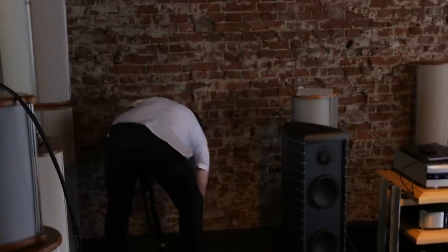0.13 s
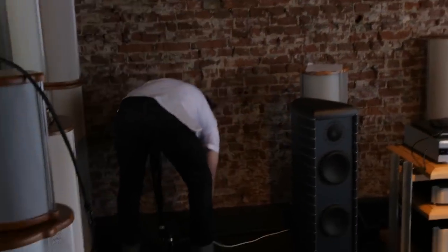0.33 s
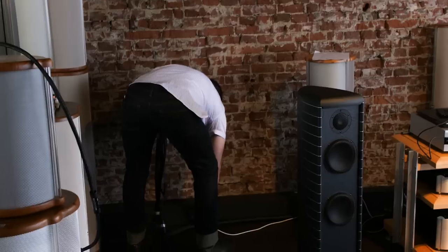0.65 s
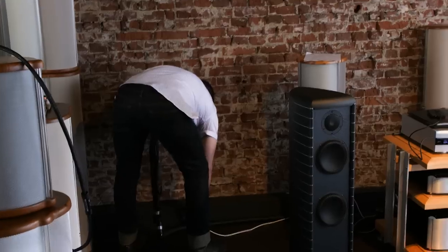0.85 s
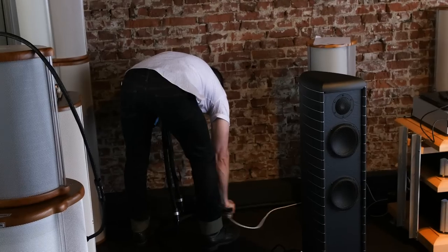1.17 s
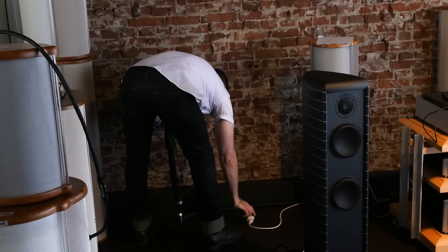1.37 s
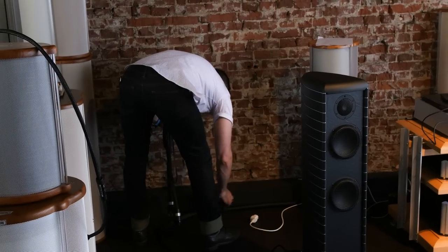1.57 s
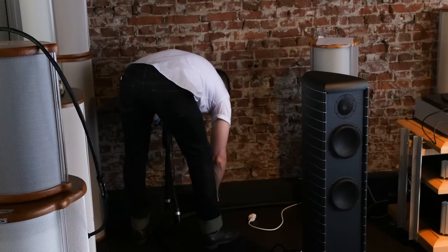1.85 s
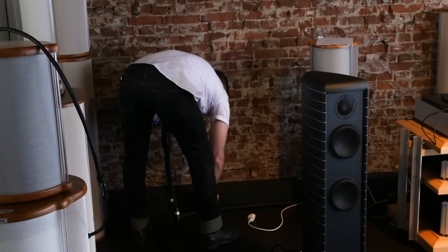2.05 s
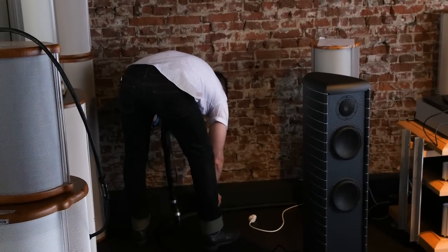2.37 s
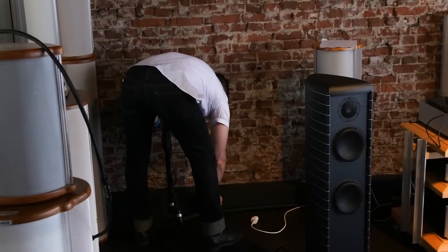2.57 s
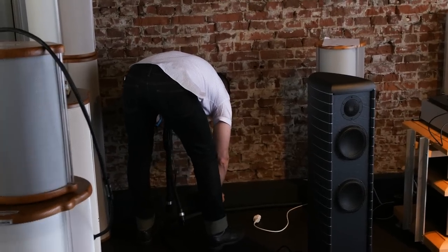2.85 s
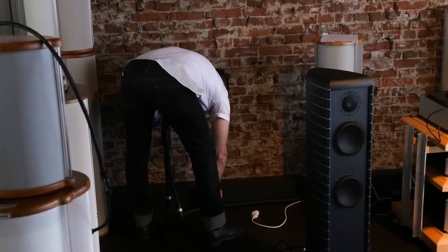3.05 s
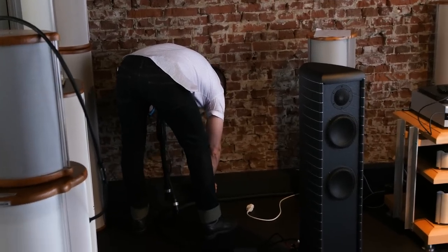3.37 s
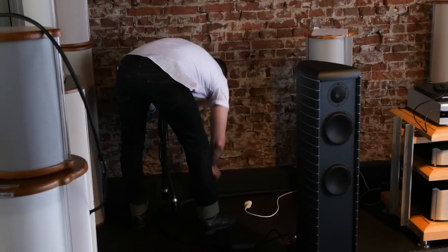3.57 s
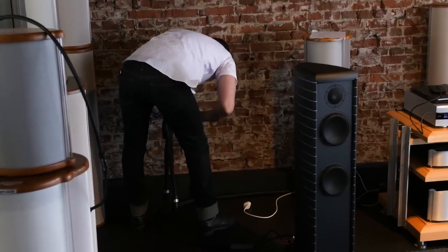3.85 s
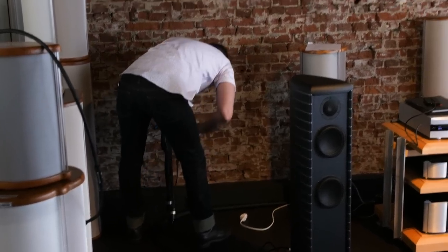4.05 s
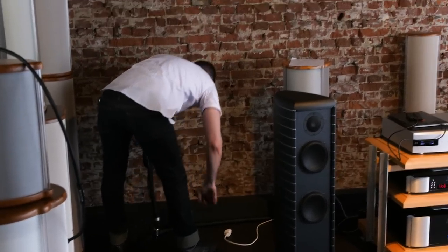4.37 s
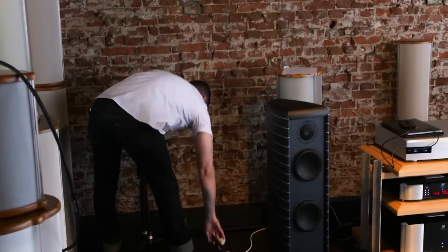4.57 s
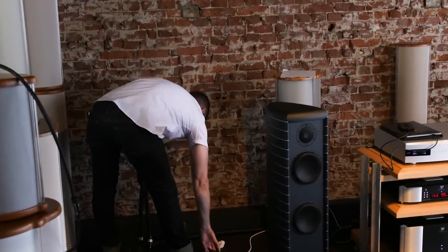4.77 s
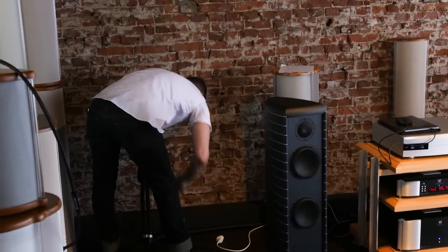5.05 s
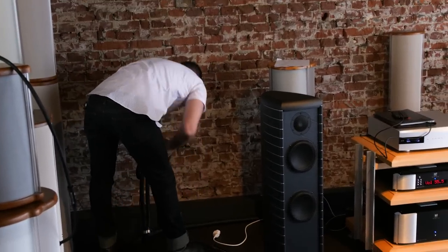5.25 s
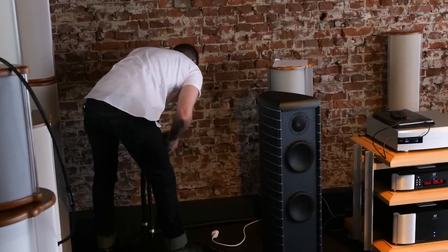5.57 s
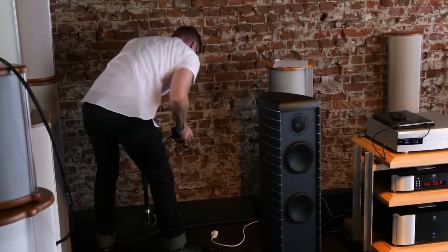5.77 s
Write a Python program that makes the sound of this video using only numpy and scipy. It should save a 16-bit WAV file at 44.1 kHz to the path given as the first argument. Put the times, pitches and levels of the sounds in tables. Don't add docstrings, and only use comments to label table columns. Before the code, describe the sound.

In a quiet brick room with faint ventilation, someone bent near the floor handles a plug and cable. Soft bumps and cloth brushing come first, then irregular hard plastic cracks with short hollow thuds from boards and a socket box. Later the cable only ticks lightly in the hands, ending with a quick bright crackle. A close stereo microphone catches dry detail and short room echo.

```python
import sys
import numpy as np
from scipy import signal
from scipy.fft import rfft, irfft
from scipy.io import wavfile
from scipy.ndimage import uniform_filter1d

SR = 44100
rng = np.random.default_rng(int(sys.argv[2]) if len(sys.argv) > 2 else 0)


def waveform_to_disk(signal):
    frames = np.transpose(np.atleast_2d(signal))
    scaled = np.clip(frames, -1, 1) * 32767
    samples = np.round(scaled).astype(np.int16)
    wavfile.write(sys.argv[1], SR, samples)


def gain_from_decibels(decibels):
    exponent = np.asarray(decibels, float) / 20
    return 10 ** exponent


N = 261072

LEFT_RIGHT = np.array([[1], [-1]])


def rms_one(x):
    return x / np.sqrt(np.mean(x ** 2) + 1e-20)


def at_hz(points, hz):
    points = np.array(points)
    return np.interp(np.log(np.maximum(hz, 1)), np.log(points[:, 0]), points[:, 1])


def colour(x, spectrum):
    hz = np.fft.rfftfreq(N, 1 / SR)
    return rms_one(irfft(rfft(x) * gain_from_decibels(at_hz(spectrum, hz)), N))


def band(x, low_hz, high_hz):
    return signal.sosfilt(signal.butter(2, [low_hz, high_hz], "band", fs=SR, output="sos"), x)


def drift(rate_hz):
    r = np.exp(-2 * np.pi * rate_hz / SR)
    wander = signal.lfilter([1], [1, -2 * r, r * r], rng.standard_normal(N + SR))
    return rms_one(wander[SR:])


def ring(x, modes):
    out = 0
    for k, (hz, db, t60) in enumerate(modes):
        r = gain_from_decibels(-60 / (max(t60, 0.002) * SR))
        w = 2 * np.pi * hz / SR
        gain = (-1) ** k * gain_from_decibels(db) * np.sin(w)
        out = out + signal.lfilter([0, gain], [1, -2 * r * np.cos(w), r * r], x + 1e-18)
    return out


def add(track, s, piece):
    i = round(s * SR)
    track[..., i:i + piece.shape[-1]] += piece[..., :N - i]


def swells(rows, rest_db):
    t = np.arange(N) / SR
    level = np.full(N, float(rest_db))
    for s, db, rise_s, fall_s in rows:
        before = (s - t) / max(rise_s, 0.01)
        after = (t - s) / max(fall_s, 0.01)
        level = np.maximum(level, db - 10 * np.maximum(before, after))
    return level


def pair(spectrum):
    # pitch_hz, likeness (0 to 1)
    likeness = [(60, 0.67), (240, 0.59), (950, 0.38), (3770, 0.13), (15000, 0.55)]
    # pitch_hz, level_db
    lean = [(60, 2), (300, -3.5), (1000, -7.5), (4000, -3)]
    hz = np.fft.rfftfreq(N, 1 / SR)
    alike = at_hz(likeness, hz)
    mid, side = rfft(rng.standard_normal((2, N)))
    both = np.sqrt(1 + alike) * mid + np.sqrt(1 - alike) * side * LEFT_RIGHT
    return colour(irfft(both * gain_from_decibels(at_hz(lean, hz) / 2 * LEFT_RIGHT), N), spectrum)


def background():
    # pitch_hz, level_db (per Hz)
    air = [(12, -25), (20, -11.5), (65, 4.5), (121, 2), (314, -4.5), (566, -10), (772, -9.5), (939, -13.5),
           (1210, -15), (1430, -20), (2810, -27), (4410, -31.5), (7510, -33.5), (14700, -36.5),
           (16500, -41)]
    # peak_s, level_db, rise_s (by 10 dB), fall_s (by 10 dB)
    sways = [(0.05, -43, .1, 0.1), (0.23, -41, .3, .5), (0.67, -40, 0, -1.8), (0.95, -43, 0.4, 1),
             (1.09, -34, -0.03, 0.25), (1.4, -40, -1.5, 0.1), (1.94, -47, 1, 0), (2.95, -45, -0.5, -0.2),
             (3.12, -41.5, 0.5, 0.26), (3.33, -43, 0.5, 0.3), (3.64, -42, 0, 0.4), (4.73, -46, 0.3, -0.2),
             (4.95, -46, -0.16, 0.6), (5.69, -35, -0.5, -0.5)]
    low = band(band(rng.standard_normal((3, N)), 46.3, 78.3), 21, 200)
    rumble = rms_one(low[0] + 1.07 * low[1:])
    return gain_from_decibels(-55) * pair(air) + rumble * gain_from_decibels(swells(sways, rest_db=-62) - 6)


def rubbing():
    # peak_s, level_db, rise_s (by 10 dB), fall_s (by 10 dB)
    brushes = [(0.0, -54, .1, -0.18), (0.25, -61, 2, 0.2), (1.1, -60.5, .02, 0.3), (1.55, -66, 1.2, 0.5),
               (1.04, -44, 0.03, 0.04), (2.57, -71.5, 3, 6), (3.1, -60.5, 0.25, -2),
               (3.635, -56, 0.1, 0.13), (3.77, -63.5, .5, 0.3), (4.2, -68, .4, 5), (4.35, -60, -0.14, 0.3),
               (4.72, -59, 0.05, 0.05), (5.55, -48.5, -0.01, 0.06), (5.585, -53, 0, .04),
               (5.625, -47, 0, 0.02), (5.775, -66, 0.2, .05), (5.83, -65, 0.7, .08),
               (4.22, -62.5, 0.1, -0.2)]
    # peak_s, level_db, rise_s (by 10 dB), fall_s (by 10 dB)
    drags = [(0.0, -47, .1, 0.05), (0.4, -55, 1.5, 1), (0.77, -44.5, -1, -0.5), (1.2, -49, 0.25, 0.08),
             (1.6, -41, 0.2, 0.1), (1.94, -67, -2, 0.5), (2.7, -44.5, 0.1, 0.42), (3.0, -54, -0.5, -0.4),
             (3.21, -47, 0.48, 0.59), (3.55, -49, 1.5, 0.07), (4.65, -53.5, 0, 0.9), (5.2, -58, 0.5, -4),
             (5.59, -53.5, -0.1, -0.7), (5.8, -72, 0, 1)]
    # pitch_hz, level_db (per Hz)
    rustle = [(1500, -2), (3000, 2.5), (5000, 1.5), (8000, 0), (11000, 0), (14000, 3.5), (16500, -2.5)]
    # pitch_hz, level_db (per Hz)
    shuffle = [(100, 3), (200, 12), (400, 8.5), (800, 5.5), (1500, -3.5), (3000, -27)]
    grains_per_s = 2000 * gain_from_decibels(2 * drift(40))
    grains = (rng.random(N) < grains_per_s / SR) * rng.standard_normal(N)
    fibres = rms_one(signal.lfilter([1], [1, -0.3], grains)) + rng.standard_normal(N)
    cloth = gain_from_decibels(swells(brushes, rest_db=-79.5) + 2.4 * drift(13)) * colour(fibres, rustle)
    drag = gain_from_decibels(swells(drags, rest_db=-67) - 2.5 + 2 * drift(34)) * pair(shuffle)
    return cloth * gain_from_decibels(0.7 * LEFT_RIGHT) + drag


def pin():
    # pitch_hz, level_db, t60_s (time to fade by 60 dB)
    metal = [(840, -54, 1)]
    tap = np.zeros(N)
    add(tap, 1.05, np.hanning(20) / 10)
    return ring(tap, metal)


def notes():
    # start_s, pitch_hz, peak_db, t60_s
    answers = [(0.7682, 3440, -51, .02), (1.011, 910, -31, 0.018), (1.0316, 6200, -23, .02),
               (1.036, 11500, -22, .015), (1.046, 6000, -21, 0.023), (1.047, 4720, -16, 0.021),
               (1.0475, 12100, -14.5, .015), (1.3775, 224, -11.5, 0.018), (1.4265, 720, -19, .02),
               (1.44, 205, -22, 0.086), (1.531, 198, -32.5, 0.12), (2.159, 255, -29.5, 0.091),
               (1.43, 2130, -16.5, 0.012), (1.431, 1000, -19.5, 0.022), (1.458, 950, -19, 0.02),
               (1.464, 416, -22, 0.029), (1.4865, 944, -16, 0.015), (1.487, 1820, -27.5, 0.031),
               (1.488, 3450, -35, 0.037), (1.5207, 976, -24.5, 0.017), (1.565, 410, -26, 0.027),
               (2.157, 650, -25.5, 0.1), (2.157, 1700, -51, 0.011), (2.429, 670, -20.5, 0.12),
               (2.428, 244, -27.5, 0.12), (2.513, 6060, -22, 0.015), (2.5155, 650, -11.5, 0.059),
               (2.517, 252, -22, 0.074), (2.5255, 650, -16, 0.025), (2.586, 3250, -37, 0.02),
               (2.651, 2740, -32.5, 0.02), (2.651, 457, -29.5, 0.14), (2.698, 263, -33, 0.15),
               (2.812, 7870, -28.5, 0.013), (2.813, 724, -26, 0.022), (2.852, 666, -31, .1),
               (3.024, 5970, -21, .03), (3.026, 8500, -22, .015), (3.028, 441.5, -22, 0.15),
               (3.028, 288, -14.5, 0.032), (3.0485, 4900, -26.5, 0.02), (3.3206, 325, -11.5, 0.03),
               (3.346, 2900, -24.5, 0.022), (3.345, 4760, -22.5, 0.011), (3.024, 1243, -31, 0.043),
               (5.515, 4380, -42, 0.027), (5.616, 1230, -36, 0.011), (5.617, 4500, -27, 0.02),
               (0.1, 590, -40, 0.028), (0.178, 2520, -48, 0.012), (0.582, 1500, -33, 0.016),
              (0.586, 516, -36, 0.041), (0.698, 1750, -43, .012), (0.744, 795, -40.5, 0.056),
              (0.77, 2200, -49, 0.016), (1.5, 298, -27, 0.024), (1.526, 327, -28, 0.021),
              (1.545, 330, -34, 0.026), (1.654, 1030, -34, 0.021), (1.675, 425, -42, 0.033),
              (2.156, 2020, -27, 0.019), (2.155, 3380, -34, .012), (2.379, 1900, -38.5, 0.019),
              (2.384, 1210, -38, 0.02), (2.972, 3180, -47, 0.01), (2.975, 6070, -49, .015),
              (3.052, 700, -22.5, 0.035), (3.07, 687, -26, 0.035), (3.08, 383, -26.5, 0.037),
              (1.434, 980, -25, 0.028), (1.47, 985, -33, 0.036), (1.033, 700, -29, 0.023),
              (5.012, 900, -46.5, 0.0091), (2.158, 785, -30, 0.028), (3.12, 133, -42, 0.12),
              (5.77, 2340, -38, .008), (5.57, 1200, -46, .015), (2.812, 930, -29, .02)]
    # start_s, pitch_hz, peak_db
    snaps = [(0.099, 2500, -56.5), (0.257, 2500, -43), (0.300, 2800, -42), (0.347, 4500, -48),
             (0.74, 3020, -48.5), (0.84, 2480, -51), (0.922, 9000, -54.5), (3.541, 6500, -37),
             (3.582, 8000, -53), (3.7096, 8000, -42.5), (3.729, 11200, -40), (3.741, 4700, -39),
             (3.756, 10500, -48), (4.213, 4600, -43), (4.25, 2600, -44.5), (4.783, 9000, -44),
             (4.864, 6000, -58), (5.064, 11000, -39), (5.086, 11000, -44), (5.1962, 7000, -18.5),
             (5.197, 3040, -26), (5.207, 8900, -28), (5.243, 8000, -44), (5.393, 2800, -45),
             (5.422, 9000, -42), (5.426, 4000, -45), (5.531, 13000, -41), (5.616, 13600, -17),
             (5.751, 11100, -26), (5.761, 13500, -31.5), (5.77, 11900, -21), (5.799, 12000, -23),
             (5.835, 13600, -35), (5.843, 13500, -34), (5.86, 11000, -42), (5.6325, 8900, -36),
             (5.664, 13100, -37), (5.816, 9000, -32), (5.594, 13000, -30), (4.738, 14000, -44),
             (3.69, 14000, -47), (4.42, 8000, -46), (5.617, 7600, -18)]
    snap_cycles, most_cycles, contact_cycles = 9, 59, 0.8
    snap_notes = [(s, hz, db, snap_cycles / hz) for s, hz, db in snaps]
    out = np.zeros(N)
    t = np.arange(SR // 4) / SR
    click = 1.0 * (t == 0)
    for s, hz, db, t60 in [*answers, *snap_notes]:
        t60 = min(t60, most_cycles / hz)
        onset = 1 - np.exp(-t * hz / contact_cycles)
        add(out, s, onset * ring(click, [(hz, db, t60)]))
    return out


def pushes():
    # start_s, boards_peak_db, boards_pitch_hz, box_db, box_pitch_hz
    blows = [(0.579, -30.5, 213, -40, 540), (1.011, -39, 229, -43, 643), (1.028, -30, 307, -21, 700),
             (1.042, -28, 380, -35, 670), (1.379, -18.5, 189, -28.5, 493), (1.430, -17, 349, -17.5, 840),
             (1.457, -26.5, 437, -34, 910), (1.486, -30, 336, -30, 830), (1.518, -25, 340, -37, 895),
             (1.551, -29.5, 330, -34, 515), (1.643, -33.5, 310, -33, 507), (2.156, -25.5, 247, -25, 607),
             (2.427, -27.5, 370, -26, 680), (2.514, -17, 302, -19.5, 670), (2.648, -26, 326, -23, 770),
             (2.691, -25, 282, -34, 720), (2.811, -25.5, 409, -22, 773), (3.022, -25, 334, -18, 670),
             (3.027, -13.5, 360, -25.5, 734), (3.313, -34, 293, -47, 650), (3.342, -28.5, 356, -29, 760),
             (4.646, -42.5, 370, -43, 910), (4.681, -36.5, 301, -35.5, 775), (4.701, -44, 302, -59, 600)]
    # start_s, boards_peak_db, boards_pitch_hz, box_db
    nudges = [(0.099, -35.5, 200, -46), (0.177, -31, 223, -47.5), (0.268, -42, 272, -45),
              (0.282, -61, 300, -40.5), (0.298, -42, 275, -46), (0.417, -45.5, 287, -42.5),
              (0.69, -43.5, 334, -40.5), (0.703, -48, 336, -40.5), (0.741, -44, 377, -46),
              (0.967, -49, 340, -51), (2.379, -41.5, 460, -35.5), (2.584, -31, 356, -44),
              (2.85, -38, 423, -33), (3.044, -34, 397, -27.5), (3.53, -42.5, 492, -47),
              (3.559, -34, 262, -63), (3.857, -46, 175, -50), (4.439, -47.5, 272, -52),
              (5.008, -50, 167, -45.5), (5.541, -38, 205, -44), (5.614, -41, 179, -47),
              (5.633, -48, 377, -50), (5.764, -61, 210, -54.5), (5.887, -42, 162, -69)]
    blow_contact_s, nudge_contact_s, nudge_box_hz = 0.0084, 0.0046, 720
    return sorted([(*row, blow_contact_s) for row in blows]
                  + [(*row, nudge_box_hz, nudge_contact_s) for row in nudges])


def thuds():
    # pitch_hz, level_db, t60_s
    boards = [(113.8, 1, 0.094), (175, -2.5, 0.055), (244.4, -2.5, 0.054), (276.8, 2, 0.048),
              (310.6, 5.5, 0.047), (348.5, -0.5, 0.045), (391.6, 0.5, 0.064), (472, 4, 0.11)]
    # pitch_hz, level_db, t60_s
    box = [(540, -9, 0.066), (600, -3, 0.06), (670, 2, 0.035), (796.6, -1.5, 0.089), (877, 2, 0.022),
           (939, -7.5, 0.044), (1220, 5.5, 0.022), (1183, -3.5, 0.066)]
    # pitch_hz, level_db, t60_s
    joists = [(117.7, -44.5, 0.44), (136, -45, 0.094)]
    scatter_db, detune, focus_db_per_octave = 2, 0.04, 17
    tap_s, swell_s, longest_t60_s = 0.00018, 0.0009, 0.047
    out = np.zeros(N)
    t = np.arange(SR // 3) / SR
    blows = pushes()
    luck = rng.standard_normal((len(blows), 2, t.size))
    for (s, boards_db, boards_hz, box_db, box_hz, contact_s), (rock, z) in zip(blows, luck):
        rocking = 0.5 * rock * (1 - np.exp(-t / swell_s)) * np.exp(-t / contact_s)
        push = np.exp(-t / tap_s) + rocking
        spots = [(boards_db, boards_hz)] * len(boards) + [(box_db, box_hz)] * len(box)
        modes = []
        for k, ((hz, level, t60), (db, spot_hz)) in enumerate(zip([*boards, *box], spots)):
            far_db = focus_db_per_octave * abs(np.log2(hz / spot_hz))
            mode_db = level + db + scatter_db * z[k] - far_db
            modes.append((hz * (1 + detune * z[-1 - k]), mode_db, min(t60, longest_t60_s)))
        add(out, s, gain_from_decibels(-18) * ring(push, modes))
    return band(out + ring(out, joists), 134, 3600)


def contacts():
    # start_s, crack_peak_db, top_share_db, body_db, t60_s
    hits = [(0.582, -35, 19, -44.5, 0.02), (0.6966, -25, 3.5, -48.5, 0.02), (1.024, -27.5, 0, -36, 0.035),
            (1.0339, -13, 1.5, -30.5, 0.042), (1.045, -5.5, -13, -31.5, 0.022),
            (1.429, -15.5, 8, -31, 0.021), (1.458, -24.5, -8, -50, 0.042), (1.484, -18, -4, -40.5, 0.045),
            (1.5202, -30.5, 3.5, -44, 0.028), (2.1551, -29, 0, -36.5, 0.038),
            (2.4264, -25.5, -36, -41.5, 0.053), (2.5132, -21.5, 8.5, -34.5, 0.018),
            (2.648, -28, 3, -46, 0.037), (2.6887, -24.5, -25, -45, 0.028), (2.8102, -25.5, 0, -39, 0.037),
            (3.02, -10, -1, -37, 0.013), (3.023, -11, 4.5, -30.5, 0.027), (3.0475, -19.5, -1, -43, 0.013),
            (3.316, -29, -1, -43.5, 0.041), (3.3425, -13.5, -2, -29.5, 0.023),
            (4.6504, -29.5, 10, -39, 0.029), (4.6798, -26, 6, -36, 0.034), (4.697, -23, -5, -49, 0.044),
            (5.1957, -17.5, -9, -53, 0.021)]
    # start_s, crack_peak_db, top_share_db, body_db
    scuffs = [(0.176, -46, 0, -53.5), (0.2066, -41.5, 6, -63), (0.224, -43, 3.5, -66),
              (0.2383, -45, 8, -63), (0.2698, -39, 2.5, -57.5), (0.339, -67.5, -6, -55.5),
              (0.346, -62, -4, -59), (0.422, -29, -5, -53), (0.4351, -27, -18, -51), (0.4455, -47, 14, -61),
              (0.4992, -41.5, 6, -60.5), (0.511, -49, 11, -70), (0.571, -43.5, 9, -63),
              (0.592, -37.5, 9, -67), (0.684, -50, -12, -52.5), (0.7688, -54, 9, -59),
              (0.8061, -53, -6, -76), (0.9922, -62, 5, -57), (1.383, -38, -9, -57), (1.5464, -46, 5, -53),
              (1.652, -38.5, -14, -56), (1.8264, -50.5, 10, -70), (1.947, -48.5, 6, -76),
              (2.377, -60, -8, -53), (2.58, -31.5, -27, -52), (2.8498, -36, -3, -51),
              (2.973, -35, -15, -61.5), (3.0763, -32.5, -9, -64), (3.1878, -34, -22, -59),
              (3.2835, -38, 8, -60)]
    # start_s, crack_peak_db, top_share_db
    ticks = [(3.401, -25, -33), (3.415, -28, 0), (3.553, -41.5, 4), (3.607, -45, 16), (3.864, -38, -2),
             (3.964, -41, 7), (4.237, -40, 10), (4.2592, -35, 9.5), (4.277, -49, 16), (4.3422, -38.5, 11),
             (4.352, -36, 2), (4.368, -30.5, -5.5), (4.387, -37, 8), (4.441, -36.5, -11), (4.561, -40.5, 7),
             (5.052, -38, 9), (5.095, -46, 5), (5.1197, -36.5, 11.5), (5.1424, -42, 10), (5.18, -41.5, 10),
             (5.206, -28.5, 9), (5.236, -56, 0), (5.252, -40, 8)]
    # start_s, crack_peak_db, top_share_db
    crackle = [(5.505, -47.5, 14), (5.5143, -40, -22.5), (5.538, -26.5, 10.5), (5.5496, -34, 15.5),
               (5.564, -23.5, 9), (5.575, -31, 15), (5.592, -31, 16), (5.6025, -33.5, 18),
               (5.615, -20.5, 10), (5.6323, -19.5, 5), (5.662, -32.5, 11), (5.751, -40, 20),
               (5.761, -27, 6), (5.769, -13.5, 0), (5.798, -39, 12), (5.8152, -30, 13), (5.8597, -33.5, 1),
               (5.872, -39, -3)]
    rows = []
    for s, db, top, body, t60 in hits:
        rows.append((s, db, top, body - 1, body + 1, t60))
    for s, db, top, body in scuffs:
        rows.append((s, db, top, body - 3.5, body + 3.5, 0.048))
    for s, db, top in ticks:
        rows.append((s, db, top, db - 20.5, db - 53, 0.017))
    for s, db, top in crackle:
        t60 = 0.018 * np.exp(-0.0097 * (db + 25))
        rows.append((s, db, top, db - 26, db - 49, t60))
    return sorted(rows)


def cracks():
    edges_hz = [1200, 2300, 4900, 9500, 20000]
    lead_s, rise_s, lead_in_s = 0.01, 0.001, 0.003
    lead_in_db, grit_db, left_db = -17, 5, 1
    t = np.arange(4000) / SR - lead_s
    after = np.maximum(t, 0)
    parts, feed = np.zeros((2, 4, N))
    touches = contacts()
    noise = rng.standard_normal((len(touches), 2, t.size))
    for (s, crack_db, top_db, shell_db, knock_db, t60), (hiss, grit) in zip(touches, noise):
        chatter = gain_from_decibels(grit_db * rms_one(uniform_filter1d(grit, size=40)))
        lead_in = gain_from_decibels(lead_in_db) * np.exp(np.minimum(t, 0) / lead_in_s)
        strike = 1 - np.exp(-after / rise_s) + lead_in
        burst = hiss * chatter * strike * gain_from_decibels(-60 * after / t60)
        burst = 2.54 * burst / np.abs(burst).max()
        levels = [knock_db + 12, shell_db + 10.5, crack_db - 11, crack_db + top_db - 16]
        gains = gain_from_decibels(levels)[:, None]
        add(parts, s - lead_s, gains * burst)
        add(feed, s + 2 * rise_s, gains * np.sqrt(np.sum(burst ** 2)))
    both = 0
    ranges = zip(np.stack([parts, feed], axis=1), edges_hz, edges_hz[1:])
    for k, (x, low_hz, high_hz) in enumerate(ranges):
        both = both + (-1) ** k * band(x, low_hz, high_hz)
    hard, echo = both
    return hard * gain_from_decibels(left_db * LEFT_RIGHT), echo


def room(x):
    # t60_s, level_db
    octaves = [(0.74, -25.5), (0.94, -20.5), (0.43, -17), (0.42, -16), (0.34, -11), (0.36, -18),
               (0.29, -18.5), (0.24, -25.5), (0.1, -19.5)]
    count, shared = 4, 0.66
    t = np.arange(SR * 3 // 4) / SR
    white = rng.standard_normal((2, count, 3, t.size))
    build_up = 1 - np.exp(-(t / 0.00035) ** 2)
    tails = 0
    for k, (t60, db) in enumerate(octaves):
        decay = gain_from_decibels(db - 60 * t / t60) * build_up
        tails = tails + band(white[k % 2], 40 * 2 ** k, 80 * 2 ** k) * decay
    place = np.arange(N) // 450 % count
    out = 0
    for k, tail in enumerate(tails):
        here = x * uniform_filter1d(1.0 * (place == k), size=300)
        out = out + signal.fftconvolve(here[None], tail[1:] + shared * tail[0], axes=1)[:, :N]
    return gain_from_decibels(-18) * out


def scene():
    hard, echo = cracks()
    wood = thuds() + pin()
    parts = notes()
    bright = parts - band(parts, 26, 4000)
    dull = parts - bright
    direct = hard + wood + dull + bright * gain_from_decibels(1.5 * LEFT_RIGHT)
    late = np.roll(direct.mean(axis=0), round(0.0003 * SR))
    shaded = 0.16 * band(late, 1500, 15600) * LEFT_RIGHT
    walls = room(echo + wood + 0.47 * dull)
    return direct + shaded + walls + rubbing() + background()


def band_limit(x):
    return signal.sosfilt(signal.butter(12, 17000, fs=SR, output="sos"), x)


def record(dry):
    # pitch_hz, level_db
    microphone = [(20, 0), (15800, 0), (16100, -22), (16900, -28), (17000, -90)]
    response = gain_from_decibels(at_hz(microphone, np.fft.rfftfreq(N, 1 / SR)))
    heard = irfft(rfft(dry) * response, N)
    return band_limit(heard)


dry = scene()
out = record(dry)
waveform_to_disk(out)
```